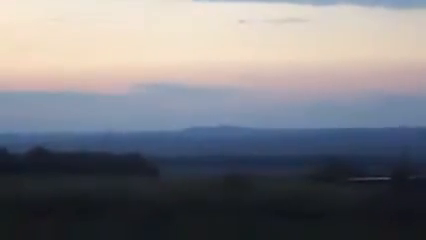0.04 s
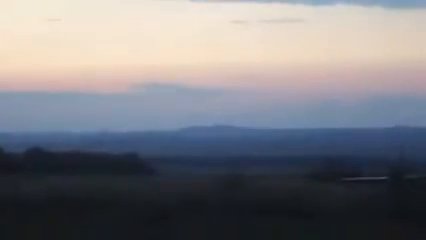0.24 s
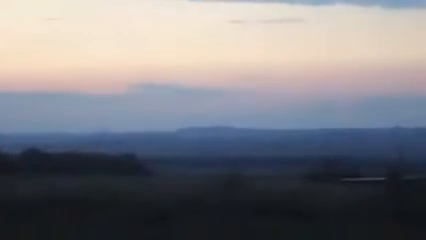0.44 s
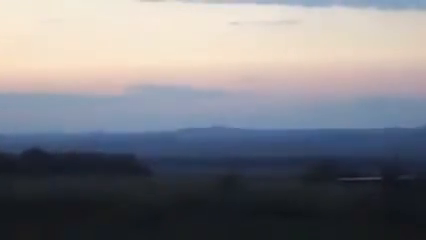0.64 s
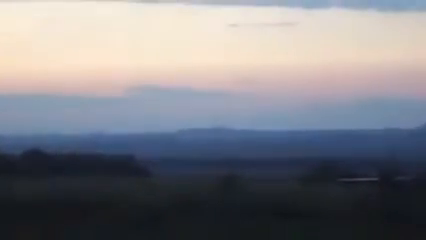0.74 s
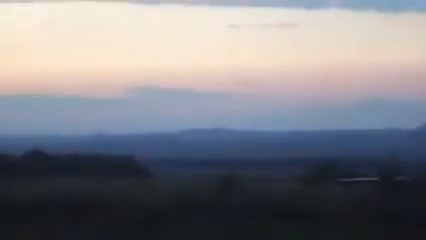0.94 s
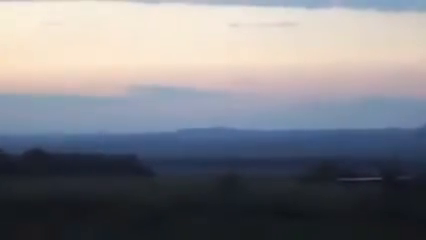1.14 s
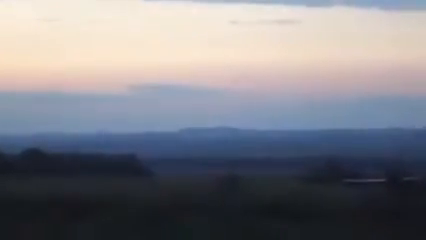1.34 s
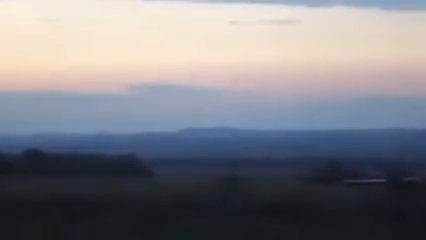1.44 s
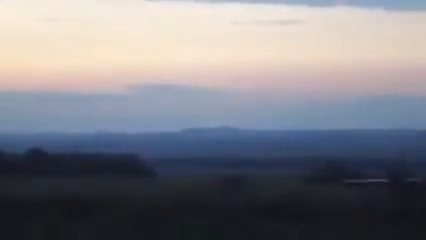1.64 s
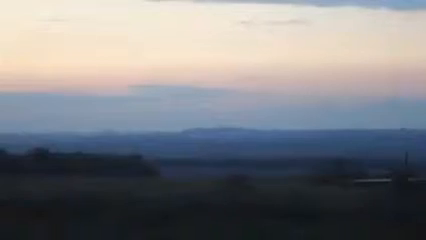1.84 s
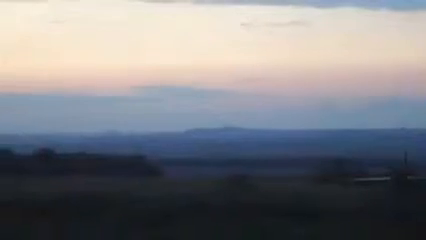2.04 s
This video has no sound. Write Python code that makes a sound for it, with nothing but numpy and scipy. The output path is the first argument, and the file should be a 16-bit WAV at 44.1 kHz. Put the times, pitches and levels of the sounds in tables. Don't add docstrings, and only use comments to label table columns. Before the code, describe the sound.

Distant heavy gun blasts boom across open country, echoes rolling, while bush crickets buzz faintly

```python
import sys
import numpy as np
from scipy import signal
from scipy.io import wavfile
from scipy.ndimage import uniform_filter1d

SR = 44100
rng = np.random.default_rng(int(sys.argv[2]) if len(sys.argv) > 2 else 0)


def log_audio(samples):
    frames = np.atleast_2d(samples).T
    limited = np.clip(frames, -1, 1)
    pcm = np.round(limited * 32767).astype(np.int16)
    wavfile.write(sys.argv[1], SR, pcm)


def invert_db(x):
    u = np.asarray(x, float) / 20
    return 10 ** u


N = 92610

# start in seconds, level in dB, rise in seconds,
# time to fall by 60 dB in seconds, centre in Hz.
ECHO_SWELLS = [(-.2, -47.5, 0.058, 7.5, 265), (0.221, -19.5, 0.0082, 0.47, 900),
               (0.253, -16, 0.025, 0.57, 473), (0.291, -13.5, 0.02, 0.12, 800),
               (0.328, -26.5, 0.022, 2.65, 334), (.33, -29, 0.057, 3.52, 636),
               (.425, -24, 0.0079, 0.42, 637), (0.524, -23.5, 0.01, 0.31, 920),
               (0.644, -24.5, 0.014, .2, 534), (0.839, -34.5, 0.01, 1.8, 540),
               (1.056, -28.5, 0.01, 0.12, 450), (1.077, -16, 0.025, .15, 1160),
               (1.11, -24, 0.037, 1.35, 215), (1.121, -27, 0.018, 2.95, 687), (1.31, -29, .012, 0.34, 242),
               (1.395, -38, 0.014, 0.15, 410), (1.542, -39, 0.01, 0.11, 250),
               (1.623, -35, 0.0067, 1.1, 680), (1.947, -37.5, .025, 0.61, 272),
               (2.009, -28, 0.0066, 0.23, 646), (1.79, -45, 0.0043, 0.19, 700),
               (2.056, -40, 0.016, .5, 253), (0.223, -27.5, 0.013, 0.51, 320),
               (1.07, -22.5, 0.022, 0.4, 840)]
# middle in seconds, peak in dB, swing pitch in Hz, crack level in dB.
WAVE_FRONTS = [(0.2339, -7.5, 409, -45), (0.2721, -4, 475, -35), (.2905, -13, 498, -42),
               (0.3101, -10, 420, -27.5), (.321, -12.5, 592, -19), (0.3408, -5, 590, -31.5),
               (.442, -21.5, 492, -64), (.667, -13.5, 564, -58.5), (1.1097, -11, 516, -23.5),
               (1.1307, -10, 650, -50), (1.320, -19, 265, -57), (2.0673, -21, 297, -74),
               (0.185, -81, 500, -34), (1.064, -21, 504, -60), (.252, -30, 700, -44)]
# start in seconds, level in dB, rise in seconds,
# time to fall by 60 dB in seconds, centre in Hz.
CRACKLE_BURSTS = [
    (.222, -26, 0.017, 0.19, 890),
    (.262, -30.5, 0.0078, 0.13, 1600),
    (0.294, -34, 0.017, 0.14, 1600),
    (0.335, -36.5, .006, 0.027, 1900),
    (.312, -35.5, 0.0088, 0.084, 2400),
    (.53, -45.5, 0.019, .3, 2020),
    (1.069, -24.5, .035, 0.05, 1400),
    (1.122, -40.5, .01, .2, 1490),
    (1.30, -42.5, .02, 1, 1400),
]
# start in seconds, level in dB, rise in seconds,
# time to fall by 60 dB in seconds, centre in Hz.
GROUND_THUDS = [(.24, -71, .03, 1.3, 110), (0.309, -36, .03, 0.64, 107), (.42, -43, .06, 0.76, 109),
                (.66, -47, .03, 0.86, 101.4), (.86, -52, .03, .6, 92.4), (1.102, -32, .03, 1.16, 95),
                (1.30, -45, .03, 1.35, 86), (1.62, -45.5, .03, 1.24, 101), (1.78, -52, .04, 0.55, 97),
                (1.96, -43, .04, 1.7, 162), (2.03, -38.5, .045, 1.5, 65)]
# pitch in Hz, strength in dB per Hz.
LAND_COLOUR = [(35, -25), (60, -32), (234, -0.5), (422, -5.5), (628, -2), (1390, -11.5), (3580, -37.5),
               (8450, -65), (9000, -63.5), (11700, -80), (19800, -120)]
# pitch in Hz, width in Hz, level in dB.
NEARBY_RESONANCES = [(219.2, 18.7, -3), (299, 21, -6), (341.2, 16, -9), (436, 30, -10), (567, 22.5, -5),
                     (700, 47, -7.5), (976, 20, -20.5)]
# time in seconds, level in dB.
CRICKET_LOUDNESS = [(0.0, -51.5), (0.24, -52.5), (0.4, -68), (0.41, -55.5), (0.47, -60), (0.48, -48.5),
                    (0.55, -66), (0.66, -58), (0.68, -67), (0.77, -51.5), (1.01, -52), (1.02, -45.5),
                    (1.13, -58.5), (1.27, -48.5), (1.72, -52.5), (1.73, -46), (1.77, -51), (2.1, -51)]
# pitch in Hz, strength in dB per Hz.
HUSH_COLOUR = [(15, -41.5), (25, -2), (165, 1), (264, 0.5), (444, -10.5), (645, 1), (5060, -22.5),
               (8300, -14.5), (9400, -51.5), (12200, -40.5), (20700, -120)]

ECHOES_PER_S, ECHO_SPREAD_DB = 2500, 2.5
CENTRE_SHARE, CENTRE_WIDTH = 0.59, 0.69
FRONT_CYCLES = 0.42
CRACK_HZ, CRACK_S, CRACK_DB = 3500, 0.0007, -4
CRACKLE_TOP_HZ, CRACKLE_ORDER = 3000, 6
CRICKET_HZ, CRICKET_WIDTH_HZ = 8433, 895
TEETH_PER_S, STROKES_PER_S, STROKE_DB = 330, 27, 3
LONE_STROKE = 0.6
HUSH_DB = -50
DUCK_FROM_DB, DUCK_SHARE, RECOVER_DB_PER_S = -28, 0.12, 25
HOLE_FROM_HZ, HOLE_WEAKEST_HZ, HOLE_DB, HOLE_SPREAD_DB = 3400, 7500, -77, 5.5
EDGE_HZ = 9280


def evened(x):
    return x / np.sqrt(np.mean(x ** 2) + 1e-20)


def add(mix, start_s, sound):
    at = round(start_s * SR)
    part = mix[at:at + len(sound)]
    part += sound[:len(part)]


def colour(x, points):
    f, db = np.transpose(points)
    bins_hz = np.fft.rfftfreq(8192, 1 / SR)
    gain_db = np.interp(np.log(bins_hz + 1), np.log(f + 1), np.maximum(db, -100))
    half = gain_db * np.log(10) / 20
    log_gain = np.r_[half, half[-2:0:-1]]
    phase = -signal.hilbert(log_gain).imag
    taps = np.fft.ifft(np.exp(log_gain + 1j * phase)).real[:4096]
    return signal.oaconvolve(x, taps / np.linalg.norm(taps))[:len(x)]


def ring(x, hz, width):
    pole = np.exp((-np.pi * width + 2j * np.pi * hz) / SR)
    return 2 * signal.lfilter([1 - abs(pole)], [1, -pole], x).real


def slow(top_hz):
    hz = np.geomspace(top_hz / 10, top_hz, num=16)
    t = np.arange(N) / SR
    waves = np.sin(2 * np.pi * (hz[:, None] * t + rng.random((16, 1))))
    return evened(waves.sum(0))


def swell(start, level_db, rise, t60):
    t = np.maximum(np.arange(N) / SR - start, 0)
    fade_in = np.sin(np.pi / 2 * np.minimum(t / rise, 1)) ** 2
    return fade_in * invert_db(level_db - 60 * np.maximum(t - rise, 0) / t60)


def scatter():
    u = rng.random((N, 3))
    sign = np.sign(u[:, 0] - 0.5)
    arrives = u[:, 1] < ECHOES_PER_S / SR
    size = invert_db(-ECHO_SPREAD_DB * np.log(u[:, 2] + 0.0028))
    return evened(sign * arrives * size)


def roll():
    out = np.zeros(N)
    for start, db, rise, t60, hz in ECHO_SWELLS:
        land = colour(scatter(), LAND_COLOUR)
        centre = evened(ring(land, hz, CENTRE_WIDTH * hz))
        crowd = evened((1 - CENTRE_SHARE) * land + CENTRE_SHARE * centre)
        out += swell(start, db, rise, t60) * crowd
    nearby = sum(invert_db(db) * ring(out, hz, width) for hz, width, db in NEARBY_RESONANCES)
    return 0.74 * out + nearby


def fronts():
    out = np.zeros(N)
    t = np.arange(-400, 400) / SR
    for middle, db, hz, crack_db in WAVE_FRONTS:
        bump = np.exp(-0.5 * (t * hz / FRONT_CYCLES) ** 2)
        swing = invert_db(db - 2) * bump * np.sin(2 * np.pi * hz * t)
        crack = rng.standard_normal(len(t)) * np.exp(-0.5 * (t / CRACK_S) ** 2)
        crack = ring(ring(crack, CRACK_HZ, 3000), CRACK_HZ, 4000)
        add(out, middle + t[0], swing + invert_db(crack_db + CRACK_DB) * crack)
    return out


def crackle():
    out = np.zeros(N)
    for start, db, rise, t60, hz in CRACKLE_BURSTS:
        echoes = ring(ring(scatter(), hz, 0.7 * hz), hz, 0.63 * hz)
        out += swell(start, db, rise, t60) * evened(echoes)
    distance = signal.butter(CRACKLE_ORDER, CRACKLE_TOP_HZ, fs=SR, output="sos")
    return signal.sosfilt(distance, out)


def thuds():
    out = np.zeros(N)
    for start, db, rise, t60, hz in GROUND_THUDS:
        lump = ring(ring(scatter(), hz, 0.31 * hz), hz, 0.86 * hz)
        out += swell(start, db, rise, t60) * evened(lump)
    return out


def crickets():
    level_db = np.interp(np.arange(N) / SR, *np.transpose(CRICKET_LOUDNESS))
    tooth_count = np.cumsum(TEETH_PER_S * (1 + 0.2 * slow(60))) / SR
    teeth = np.diff(np.floor(tooth_count), prepend=0) * rng.normal(1, 0.65, N)
    stroke_count = np.cumsum(STROKES_PER_S * (1 + 0.15 * slow(5.98))) / SR
    stroke = np.sin(2 * np.pi * stroke_count)
    thinness_db = np.maximum(-53.5 - uniform_filter1d(level_db, size=6000), 0)
    depth_db = STROKE_DB + LONE_STROKE * thinness_db
    drive = (0.7 * evened(teeth) + rng.standard_normal(N)) * invert_db(depth_db * stroke)
    wing = ring(ring(drive, CRICKET_HZ, CRICKET_WIDTH_HZ), CRICKET_HZ, 0.66 * CRICKET_WIDTH_HZ)
    upper = ring(drive, 9100, 2300)
    return invert_db(level_db) * (evened(wing) + invert_db(-2.5) * evened(upper))


def hush():
    return invert_db(HUSH_DB + 2.1 * slow(15)) * colour(rng.standard_normal(N), HUSH_COLOUR)


def scene():
    blasts = roll() + crackle() + thuds() + fronts()
    power_db = 10 * np.log10(abs(uniform_filter1d(blasts ** 2, 900)) + 1e-12)
    fall = np.arange(N) * RECOVER_DB_PER_S / SR
    held_db = np.maximum.accumulate(power_db + fall) - fall
    over_db = np.maximum(held_db - DUCK_FROM_DB, 0)
    duck_db = -DUCK_SHARE * uniform_filter1d(over_db, 3000)
    return (blasts + crickets() + invert_db(duck_db) * hush())[None]


def starved(x):
    hz, _, z = signal.stft(x, SR, nperseg=1024, noverlap=768)
    z, hz = z[:512], hz[:512:4, None]
    power = abs(z) ** 2
    band_power = power.reshape(128, 4, -1).sum(1)
    band_db = 10 * np.log10(uniform_filter1d(band_power, size=5) + 1e-14)
    loud_db = 10 * np.log10(uniform_filter1d(power.sum(0), size=40) + 1e-14)
    luck = evened(uniform_filter1d(rng.standard_normal(band_db.shape), size=10))
    weak_spot = np.exp(-((hz - HOLE_WEAKEST_HZ) / 300) ** 4)
    bar_db = HOLE_DB + HOLE_SPREAD_DB * luck + 0.3 * loud_db + (32 + 0.5 * loud_db) * weak_spot
    keep = np.where((band_db < bar_db) & (hz > HOLE_FROM_HZ), 0.05, 1.0)
    z = np.r_[z * np.repeat(keep, 4, axis=0), z[:1] * 0]
    return signal.istft(z, SR, nperseg=1024, noverlap=768)[1][:N]


def top_cut(x):
    return signal.sosfilt(signal.butter(12, 10290, fs=SR, output="sos"), x)


def record(dry):
    thinned = starved(dry[0])[None]
    low_pass = signal.firwin(511, EDGE_HZ, window=("kaiser", 9), fs=SR)[None]
    mix = signal.oaconvolve(thinned, low_pass, "same")
    return top_cut(mix)


dry = scene()
out = record(dry)
log_audio(out)
```